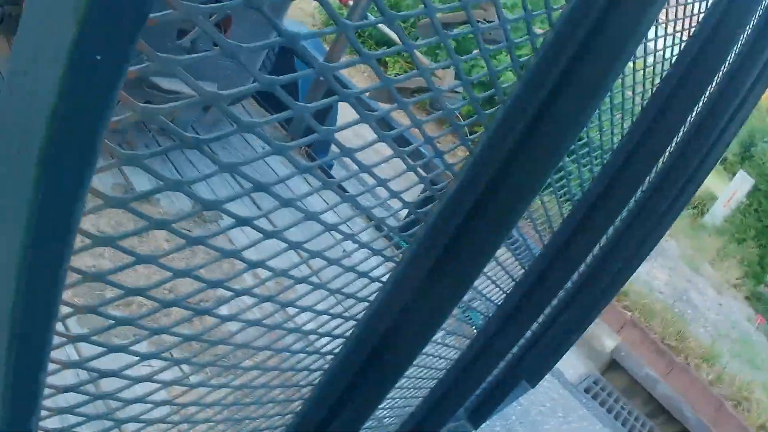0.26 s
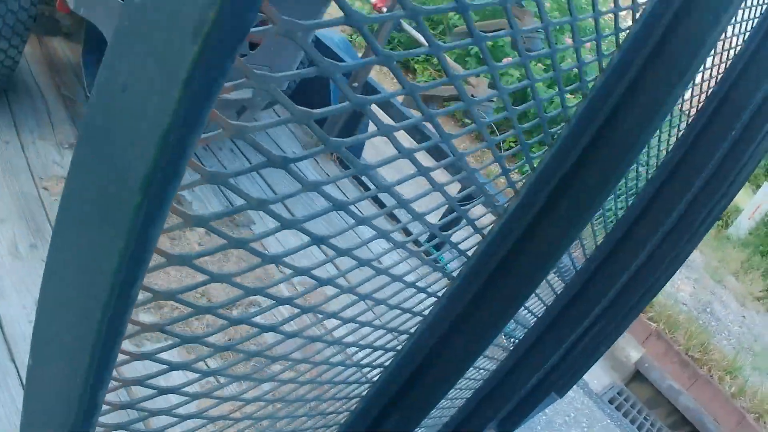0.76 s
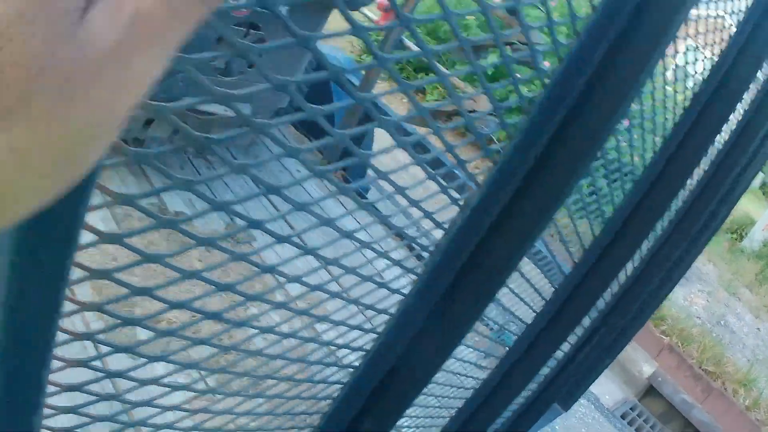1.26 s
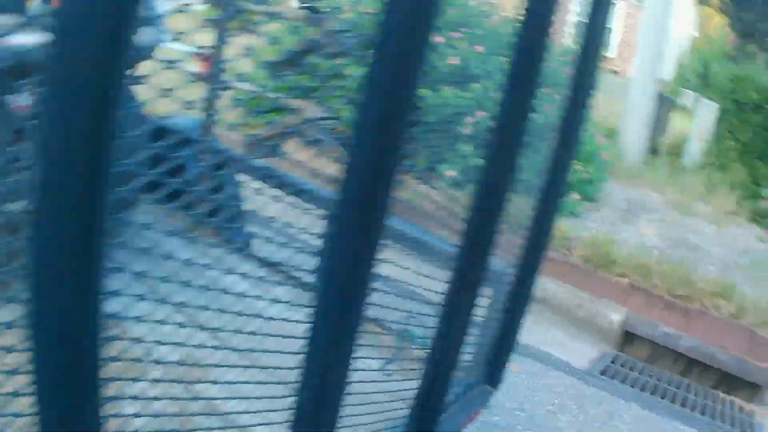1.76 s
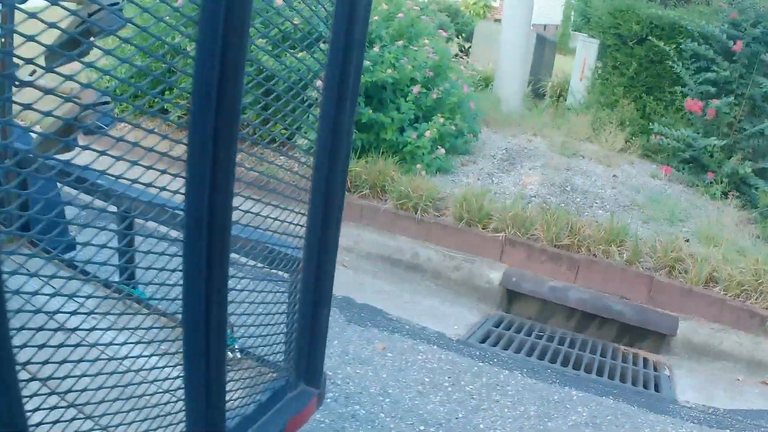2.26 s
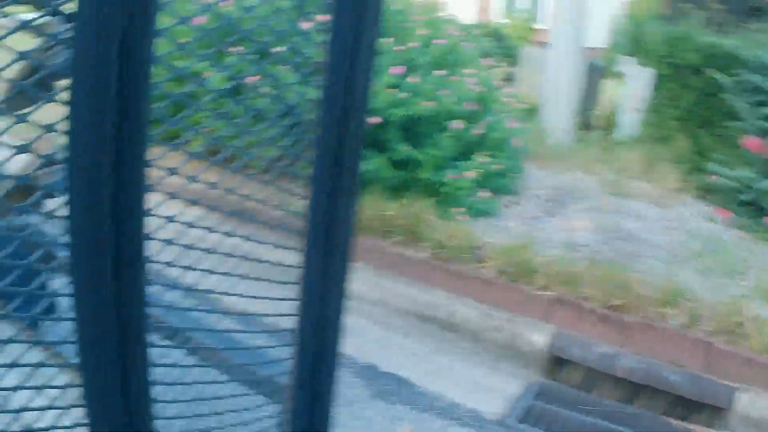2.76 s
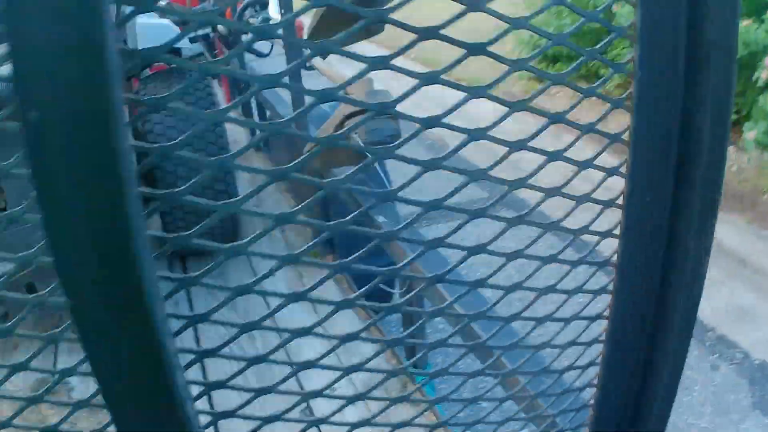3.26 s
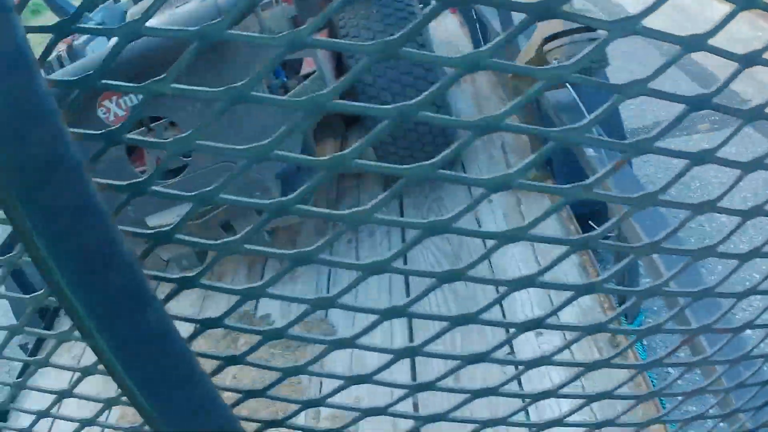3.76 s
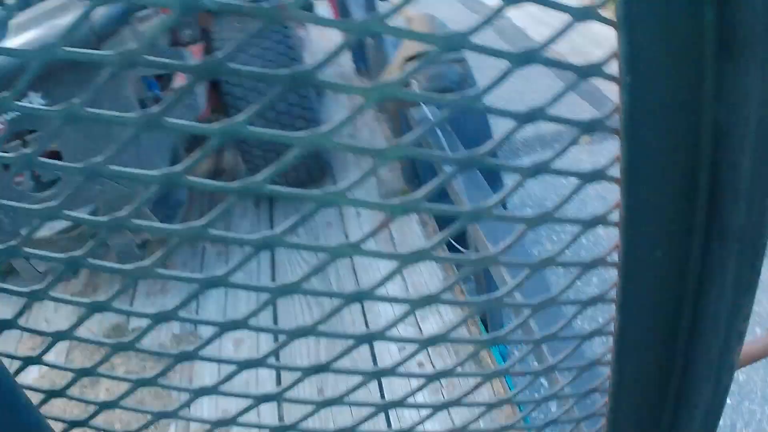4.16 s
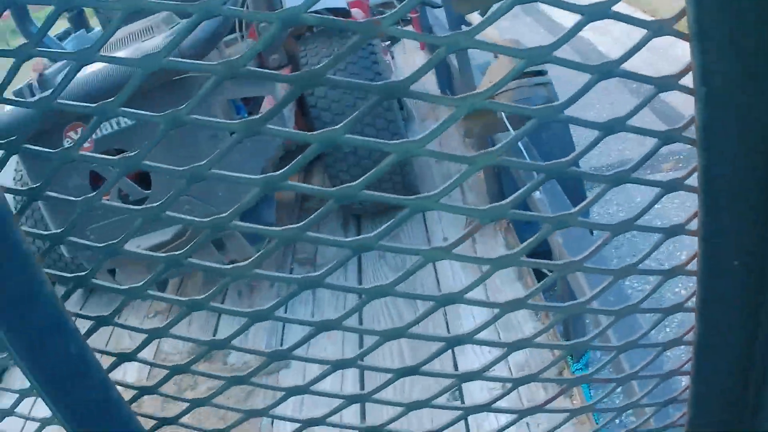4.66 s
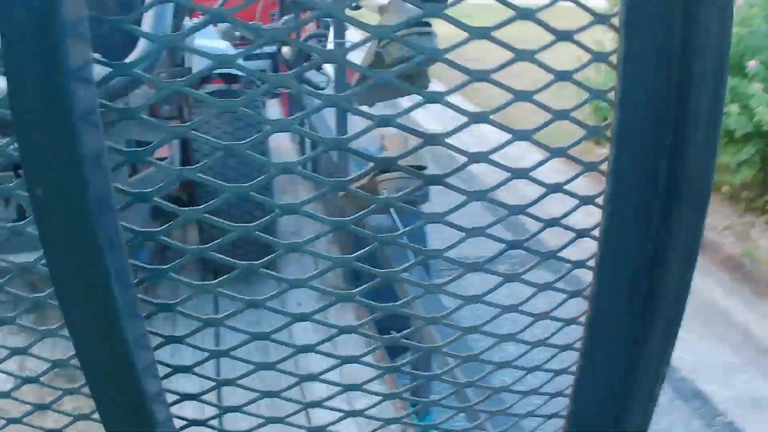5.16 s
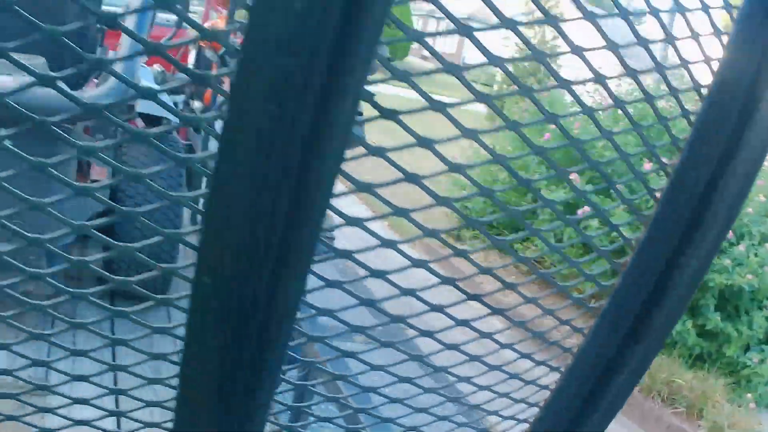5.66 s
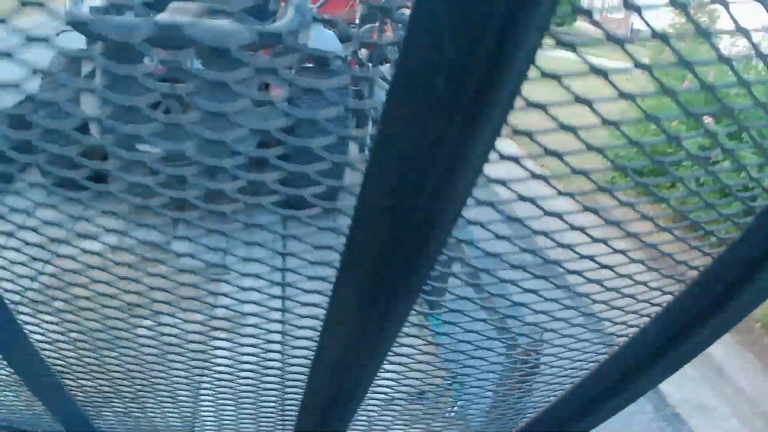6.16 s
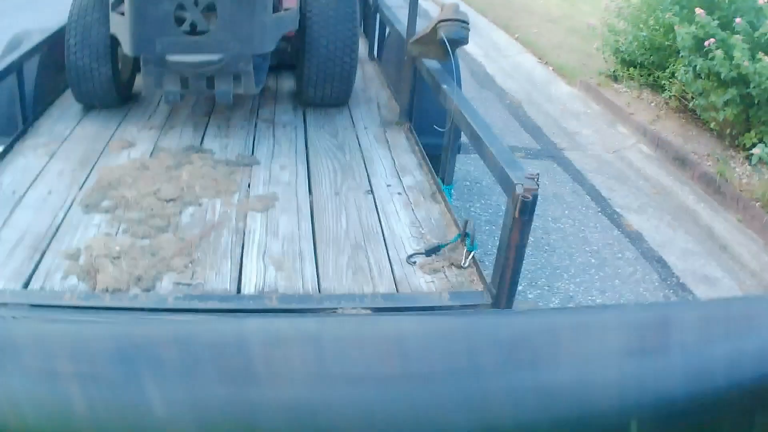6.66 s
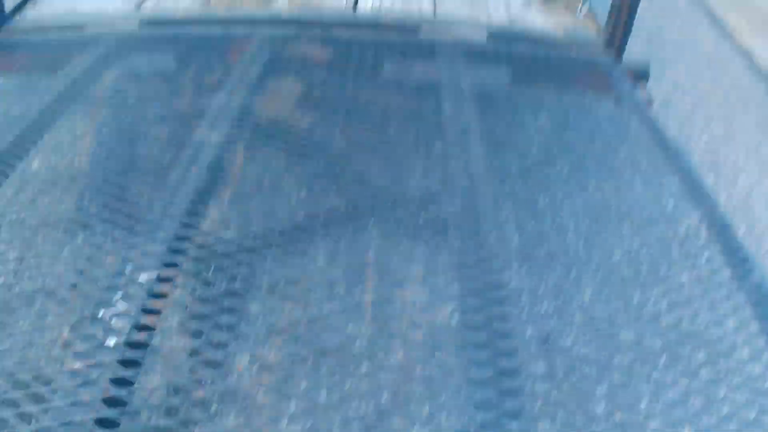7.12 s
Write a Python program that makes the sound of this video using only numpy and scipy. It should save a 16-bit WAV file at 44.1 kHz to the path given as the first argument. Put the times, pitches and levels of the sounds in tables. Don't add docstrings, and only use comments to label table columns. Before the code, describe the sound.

A steel-mesh trailer gate is handled right beside the microphone on a quiet street, with faint traffic hiss, a distant low drone and a light breeze behind. Soft mesh rattling and a short hinge note open it, with a dry latch click near 0.2 s, then near quiet. At 0.9-1.1 s a scrape and rapid hard clanks ring out, with smaller knocks at 1.3 and 1.6 s. Wind thumps the microphone around 1.8 s. Light taps and dull hand knocks follow until 3 s, then moderate clanks, a brief squeak and a dragged rattle at 3.9 s. Thin high squeaks and a pin jingle near 4.8 s precede the loudest crash at about 5 s. Strong, bright, chattering blows continue to 5.7 s. From 6 s the knocks are duller and sparser, fading until a low hinge note near 7.2 s and a last clank at 7.3 s.

```python
import sys
import numpy as np
from scipy import signal
from scipy.fft import rfft, irfft, next_fast_len
from scipy.io import wavfile
from scipy.ndimage import uniform_filter1d

SR = 44100
rng = np.random.default_rng(int(sys.argv[2]) if len(sys.argv) > 2 else 0)


def file_out(sig):
    cols = np.atleast_2d(sig).T
    lim = np.clip(cols, -1, 1)
    pcm = np.round(lim * 32767).astype(np.int16)
    wavfile.write(sys.argv[1], SR, pcm)


def how_loud(loudness_db):
    steps = np.asarray(loudness_db, float) / 20
    return 10 ** steps


N = 325899
STEP = 32
COARSE_S = np.arange(N // STEP + 2) * STEP / SR
DRAG_RISE_S = 0.0049

# (frequency [Hz], density [dB per Hz])
MESH_COLOUR = [(59, -50.5), (170, -4), (280, -4), (390, -3.5), (560, 0), (808, -5), (1130, -4.5),
               (1690, -7), (2130, -7), (2520, -9), (6000, -24), (10500, -26.5), (14500, -48.5)]
# (time [s], frequency [Hz], level [dB], t60 [s])
LATCHED_RINGS = [(0.181, 1210, -53, 0.18), (0.182, 3020, -39.5, 0.072), (0.182, 3770, -37, 0.053),
                 (0.877, 450, -29.5, 0.26), (0.877, 852, -36.5, 0.35), (0.877, 1030, -35, 0.37),
                 (0.983, 926, -32, 0.44), (0.983, 1067, -17, 0.08), (0.983, 1170, -44, 0.29),
                 (0.985, 1353, -30, 0.26), (0.982, 1448, -28, 0.29), (1.015, 940, -28, 0.23),
                 (1.015, 1076, -27, 0.27), (1.016, 1380, -22, 0.084), (0.982, 4180, -26, 0.068),
                 (1.062, 980, -31, 0.13), (1.062, 1310, -29, 0.075), (1.061, 4300, -26, 0.071),
                 (1.064, 3360, -26, 0.049), (1.326, 1180, -40, 0.053), (1.324, 1560, -43, 0.21),
                 (1.325, 2110, -39.5, 0.42), (1.326, 2740, -35, 0.075), (1.589, 1166, -40, 0.079),
                 (1.588, 1630, -47, 0.37), (1.588, 2670, -42, 0.13), (1.589, 2850, -30.5, 0.043),
                 (2.079, 742, -34, 0.07), (2.079, 1034, -40, 0.069), (2.079, 1420, -47, 0.14),
                 (2.116, 1310, -53, 0.22), (2.117, 1810, -46, 0.14), (2.913, 745, -45, 0.32),
                 (2.912, 1000, -40, 0.11), (3.274, 1010, -38, 0.093), (3.273, 1230, -40, 0.22),
                 (3.274, 1510, -39, 0.13), (3.273, 1680, -44, 0.29), (3.489, 1220, -51, 0.17),
                 (3.491, 1360, -55, 0.15), (3.684, 995, -37.5, 0.088), (3.683, 1300, -55, 0.2),
                 (3.871, 540, -34, 0.13), (3.873, 1056, -33, 0.089), (3.915, 603, -33, 0.23),
                 (3.871, 2320, -40, 0.36), (4.043, 600, -50, 0.25), (4.043, 2070, -46.5, 0.33),
                 (4.456, 1036, -42, 0.13), (4.456, 4200, -43, 0.074)]
# (time [s], frequency [Hz], level [dB], t60 [s])
FREE_RINGS = [(4.894, 472, -50, 0.37), (4.894, 1200, -47, 0.16), (4.957, 327, -21, 0.098),
              (4.957, 590, -16.5, 0.15), (4.957, 978, -8, 0.053), (4.957, 1195, -12.5, 0.074),
              (4.957, 2100, -19, 0.22), (4.957, 4170, -21, 0.099), (5.046, 583, -23, 0.15),
              (5.046, 1121, -23, 0.12), (5.046, 2200, -40, 0.16), (5.046, 2390, -30, 0.18),
              (5.046, 4340, -31, 0.13), (5.213, 1600, -30, 0.11), (5.213, 1880, -39, 0.14),
              (5.213, 2440, -44, 0.1), (5.213, 2930, -35, 0.17), (4.957, 510, -19, 0.14),
              (5.299, 1890, -23.5, 0.075), (5.299, 2940, -35.5, 0.17), (5.471, 606, -19.5, 0.17),
              (5.471, 1000, -24, 0.085), (5.471, 1154, -20, 0.15), (5.471, 1428, -18, 0.062),
              (5.471, 2300, -19.5, 0.046), (5.471, 2960, -20.5, 0.059), (5.651, 1015, -26, 0.071),
              (5.651, 1300, -23, 0.054), (5.651, 2130, -22, 0.043), (5.651, 2855, -24, 0.039),
              (5.782, 1042, -48, 0.41), (5.782, 1297, -43, 0.24), (6.033, 457, -35, 0.22),
              (6.033, 618, -33, 0.25), (6.033, 1018, -33, 0.1), (6.033, 1260, -39, 0.18),
              (6.07, 1070, -34.5, 0.083), (6.07, 1260, -40, 0.083), (6.147, 462, -41, 0.35),
              (6.147, 1020, -40, 0.059), (6.147, 1275, -39, 0.063), (6.268, 1050, -40.5, 0.086),
              (6.464, 1030, -36, 0.091), (6.464, 1390, -45.5, 0.12), (6.464, 2100, -34.5, 0.15),
              (6.678, 450, -43.5, 0.29), (6.923, 441, -52.5, 0.39), (7.327, 486, -43, 0.29),
              (7.327, 637, -39, 0.15), (7.327, 1286, -46, 0.083)]


def rms_one(x):
    return x / np.sqrt(np.mean(x ** 2) + 1e-20)


def fine(coarse):
    return np.interp(np.arange(N) / STEP, np.arange(len(coarse)), coarse)


def at_hz(points, hz):
    point_hz, value = np.transpose(points)
    return np.interp(np.log(hz), np.log(point_hz), value)


def drift(rate_hz):
    r = np.exp(-2 * np.pi * STEP * rate_hz / SR)
    chance = rng.standard_normal(N // STEP + 2002)
    return rms_one(signal.lfilter([1], [1, -2 * r, r * r], chance)[2000:])


def ring(drive, hz, t60):
    r = how_loud(-60 / (max(t60, 1 / 300) * SR))
    w = 2 * np.pi * hz / SR
    return signal.lfilter([0, np.sin(w)], [1, -2 * r * np.cos(w), r * r], drive + 1e-18)


def bands(low_hz, count, grit_db=0):
    edges = low_hz * 2 ** (np.arange(count + 1) / 3)
    white = rng.standard_normal((2, N))
    white = rms_one(white * how_loud(grit_db * np.minimum(rng.exponential(1, N), 5)))
    for k in range(count):
        sos = signal.butter(2, edges[k:k + 2], "band", fs=SR, output="sos")
        yield np.sqrt(edges[k] * edges[k + 1]), signal.sosfilt(sos, white[k % 2])


def coloured(spectrum, low_hz, count, patchy_db, rate_hz):
    out = np.zeros(N)
    for hz, noise in bands(low_hz, count):
        out += noise * fine(how_loud(at_hz(spectrum, hz) + patchy_db * drift(rate_hz)))
    return rms_one(out)


def dying(s, db, t60, rise_s, count=900):
    age = np.arange(count) * STEP / SR
    fall = np.exp(-2 * np.log(1000) * age / np.maximum(t60, .01)[:, None])
    power = (1 - np.exp(-age / rise_s)) ** 2 * how_loud(2 * db)[:, None] * fall
    at = (s * SR / STEP).astype(int)[:, None] + np.arange(count)
    return np.bincount(at.ravel(), power.ravel(), N // STEP + 2)[:N // STEP + 2]


def window(s, length, edge_s):
    opening = (COARSE_S - s) / edge_s
    closing = (s + length - COARSE_S) / (3 * edge_s) + 1
    return np.clip(np.minimum(opening, closing), 0, 1)


def street():
    # (frequency [Hz], density [dB per Hz])
    far_colour = [(60, -31), (100, -7), (175, 1.5), (200, -11.5), (500, -20.5), (1200, -29.5),
                  (3000, -33.5), (6000, -37.5), (15800, -41.5)]
    size = next_fast_len(N)
    colour = how_loud(at_hz(far_colour, np.arange(size // 2 + 1) * SR / size + 1))
    hiss = rms_one(irfft(rfft(rng.standard_normal(size)) * colour, size)[:N])
    drone = rms_one(ring(rng.standard_normal(N), hz=110, t60=0.55))
    return how_loud(-60) * hiss * fine(how_loud(0.72 * drift(3))) + how_loud(-60) * drone


def wind_db():
    # (time [s], peak [dB], loss either side [dB per s])
    gusts = [
        (0.39, -49, 37),
        (0.9, -51, 15),
        (1.77, -31.5, 124),
        (1.97, -41, 45),
        (5.95, -43.5, 49),
        (7.119, -46, 35),
        (7.33, -46.5, 132),
    ]
    breeze_db = -52 + 0.5 * drift(2.0)
    return np.max([breeze_db] + [db - loss_db * abs(COARSE_S - s) for s, db, loss_db in gusts], axis=0)


def wind():
    # (frequency [Hz], density [dB per Hz])
    gust_colour = [(20, -4.5), (35, 1), (60, 2), (110, -5), (200, -13), (400, -36)]
    # (time [s], level [dB], frequency [Hz], t60 [s])
    bumps = [(.56, -43.5, 254, 0.2), (.88, -29, 170, .15), (1.02, -22.5, 260, .2), (1.0, -27, 200, .15),
             (1.3, -35, 160, .15), (1.6, -34, 165, .12), (1.758, -15, 57, 0.047), (1.985, -33, 166, 0.12),
             (1.992, -30, 250, .08), (1.99, -36, 370, .08), (2.008, -33, 212, .1), (3.04, -40, 145, .15),
             (3.49, -37, 185, .15), (4.96, -23, 185, .12), (5.13, -29.5, 175, 0.15), (5.77, -32, 195, 0.1),
             (5.95, -36, 45, .045), (6.945, -42, 200, .12)]
    out = fine(how_loud(wind_db())) * coloured(gust_colour, 20.15, count=13, patchy_db=5.5, rate_hz=3.2)
    for s, db, hz, t60 in bumps:
        knock = np.zeros(N)
        knock[int(s * SR):int(s * SR) + 60] = how_loud(db) / 60
        out += ring(knock, hz, t60)
    return out


def singing():
    # (time [s], length [s], frequency [Hz], level [dB])
    squeaks = [(0.005, 0.031, 1000, -39), (0.055, 0.044, 1004, -39.5), (0.1, 0.036, 1014, -44),
               (0.546, 0.077, 995, -56.5), (1.03, 0.2, 12130, -70), (1.33, .2, 12150, -70),
               (4.161, 0.014, 6700, -48), (0.43, .035, 4170, -72), (4.143, .015, 5500, -56),
               (4.344, 0.028, 6740, -48), (6.47, .12, 2050, -52.5), (0.881, 0.067, 1000, -32.5),
               (0.882, 0.035, 450, -54), (1.266, 0.069, 450, -33.5), (2.628, .03, 7700, -72),
               (3.305, 0.13, 504, -45), (4.741, 0.034, 6200, -58), (4.745, .03, 5450, -69),
               (4.789, 0.079, 9680, -43), (4.812, 0.054, 5400, -47), (4.837, .02, 7960, -42),
               (4.835, .015, 12000, -56), (5.333, 0.084, 9700, -61), (5.34, .02, 12100, -63),
               (2.0, 0.11, 5850, -64), (3.303, 0.12, 1510, -46), (3.32, 0.071, 1000, -48),
               (3.32, 0.088, 1183, -50), (4.957, 0.033, 5470, -32), (4.996, 0.027, 9600, -38),
               (5.12, .035, 9500, -47), (4.998, .06, 8100, -44), (5.07, 0.03, 11800, -50),
               (1.07, 0.18, 517, -60), (4.41, 0.027, 6600, -45), (1.32, 0.028, 6370, -35.5),
               (3.678, 0.03, 12000, -45), (5.227, 0.07, 9750, -52), (6.712, .055, 5700, -68.5),
               (7.168, 0.037, 4180, -72), (7.344, .05, 4140, -72)]
    # (time [s], length [s], frequency [Hz], level [dB])
    lowering = [
        (7.176, 0.059, 564, -38.5),
        (7.25, 0.082, 565, -50),
        (7.185, 0.11, 2080, -51.5),
    ]
    notes = [(*row, 0.0095) for row in squeaks] + [(*row, 0.035) for row in lowering]
    out = np.zeros(N)
    wavering_t = np.arange(N) / SR + 0.0025 * np.cumsum(fine(drift(40))) / SR
    for s, length, hz, db, rise_s in notes:
        swell = np.clip((COARSE_S - s) / rise_s, 0, 1)
        fade_db = np.clip(-7.0 * (COARSE_S - s) / length, -30, 0)
        level = how_loud(db + fade_db + 4.2 * drift(45)) * window(s, length, 0.0073) * swell
        level = fine(level)
        on = level > 0
        out[on] += level[on] * np.sin(2 * np.pi * hz * wavering_t[on])
    return out


def pin():
    # (frequency [Hz], level [dB], t60 [s])
    pin_modes = [(2760, 3, 0.34), (3760, -4, 0.19), (4600, 1, 0.23), (5700, 5, 5.0), (6358, -5, 0.13),
                 (7500, -4, 1.7), (8200, 6, 0.22), (9330, -3, 0.35), (10250, -3, 0.19), (10850, -9, 0.22),
                 (11800, -7, 0.076), (13740, -15, 0.22)]
    # (time [s], length [s], level [dB])
    jingles = [
        (1.978, 0.05, -63.5),
        (4.781, 0.095, -57.5),
    ]
    shake = fine(sum(how_loud(db) * window(s, length, 0.0065) for s, length, db in jingles))
    touches = (rng.random(N) < 900 / SR) * shake
    out = np.zeros(N)
    for hz, db, t60 in pin_modes:
        out += ring(touches * how_loud(db) * rng.standard_normal(N), hz, min(t60, 0.022))
    return out


def snaps():
    # (time [s], level [dB])
    clicks = [
        (6.301, -31),
        (.1832, -31),
        (4.0445, -31),
    ]
    # (frequency [Hz], level [dB], t60 [s])
    snap_modes = [(2200, -3, .006), (4200, -4, .005), (6300, 0, .004), (9300, 1, .005), (11200, -5, .004)]
    s, level_db = np.transpose(clicks)
    drive = np.zeros(N)
    drive[(s * SR).astype(int)] = how_loud(level_db)
    drive = uniform_filter1d(drive, size=3)
    return sum(ring(drive * how_loud(db), hz, t60) for hz, db, t60 in snap_modes)


def blows():
    # (time [s], peak [dB], mesh brightness [dB re peak], clank [Hz])
    latched = [(0.051, -30.5, -22, 930), (0.101, -41, -34, 970), (0.184, -30, -9, 1220),
               (0.198, -35, -4, 1080), (0.477, -45, -10, 465), (0.886, -29, -12.5, 453),
               (0.984, -13, -10.5, 1050), (1.016, -15, -9.5, 919), (1.063, -18, -4.5, 1324),
               (1.249, -38, -15, 870), (1.266, -34, -20, 446), (1.326, -19.5, -6.5, 1275),
               (1.589, -23, -14.5, 1515), (1.713, -31, -26.5, 1284), (2.079, -28.5, -35.5, 1000),
               (2.116, -41, -15, 1885), (2.149, -40, -27, 1950), (2.193, -39.5, -21.5, 1920),
               (2.353, -42.5, -20, 1810), (2.895, -38.5, -21, 1520), (2.914, -29, -24, 1052),
               (2.989, -31, -18.5, 1002), (3.043, -32.5, -15.5, 1024), (3.274, -24, -21.5, 1470),
               (3.426, -38, -11.5, 589), (3.462, -33, -25, 1540), (3.492, -26, -8, 954),
               (3.624, -37.5, -8.5, 422), (3.683, -31.5, -4, 1004), (3.833, -37, -19, 945),
               (4.045, -29.5, -12, 1520), (4.401, -41.5, 4.5, 1890), (4.457, -32, -4.5, 2275)]
    # (time [s], peak [dB], mesh brightness [dB re peak], clank [Hz])
    free = [(4.794, -34.5, -8, 1176), (4.81, -34, -0.5, 1888), (4.958, -5, -8.5, 1060),
            (5.046, -12.5, -10, 581), (5.214, -12, -20, 2320), (5.472, -9.5, -11, 1112),
            (5.654, -15.5, -16, 1372), (5.782, -24, -22, 1299), (5.874, -38.5, -7.5, 572),
            (6.035, -22.5, -24.5, 642), (6.07, -25.5, -27, 446), (6.148, -24, -26, 902),
            (6.226, -33.5, -30.5, 475), (6.268, -29.5, -32, 617), (6.32, -33.5, -27.5, 453),
            (6.453, -28, -20, 612), (6.465, -22.5, -20, 1195), (6.679, -33.5, -34, 658),
            (7.156, -40.5, -24.5, 1930), (7.255, -47.5, -25, 2620), (7.327, -29, -23, 605),
            (7.338, -34.5, -35, 471)]
    # (time [s], peak [dB], mesh brightness [dB re peak], clank [Hz])
    drags = [(0.129, -40, -19, 980), (0.822, -39.5, -9.5, 823), (0.875, -23.5, -3, 890),
             (1.581, -26, -10, 420), (3.871, -19, -7.5, 1875), (3.91, -27, -8, 624),
             (4.859, -28.5, 4, 1367), (4.895, -16, -6, 436), (5.298, -20, -12.5, 2300),
             (5.399, -38.5, -1.5, 1900), (5.072, -16.5, -5.5, 604), (6.92, -43, -55.5, 681),
             (6.965, -48, -47, 514)]
    # (time [s], peak [dB])
    faint = [(0.529, -53.5), (0.569, -57), (0.658, -50), (0.792, -52.5), (1.557, -42.5), (1.76, -37),
             (1.783, -41), (3.779, -44.5), (4.266, -48), (4.353, -42), (4.754, -57), (4.783, -45),
             (5.94, -43), (6.427, -53.5), (6.608, -45.5), (6.633, -54)]
    touches = [(s, db, -29, 450) for s, db in faint]
    # (rows, thud [dB re peak], chatter t60 [s], 1 if dragged)
    kinds = ((latched, -11.5, 0.27, 0), (free, -13.5, 0.22, 0), (drags, -11, 0.33, 1), (touches, -14, 0.29, 0))
    rows = [(*row, *kind[1:]) for kind in kinds for row in kind[0]]
    s, peak_db, bright_db, clank_hz, thud_db, t60, dragged = np.transpose(rows)
    thud_db = thud_db + 0.04 * np.maximum(-30 - peak_db, 0)
    thud_db = thud_db - 4 * np.log2(clank_hz / 800)
    thud_db += -9.5 * ((s > 2.8) & (s < 3.4))
    return np.array([s, peak_db, thud_db, bright_db, t60, clank_hz, dragged])


def blow_colour(hz):
    s, peak_db, thud_db, bright_db, t60, clank_hz = blows()[:6]
    low = at_hz([(280, 0.84), (700, 0)], hz)
    high = at_hz([(1100, 0.011), (2000, 0.19), (5000, 0.88), (13000, 1.0)], hz)
    ring_s = np.array([row[0] for row in [*LATCHED_RINGS, *FREE_RINGS]])
    rung = np.min(abs(s[:, None] - ring_s), axis=1) < 1 / 150
    peak_db = peak_db - 3 * rung * at_hz([(250, 0), (500, 1), (2200, 0.81), (3500, 0.0)], hz)
    spot_db = 4.7 * np.exp(-(np.log2(hz / clank_hz) / 0.34) ** 2)
    return peak_db + at_hz(MESH_COLOUR, hz) + low * (thud_db + 18.0) + high * (bright_db + 16.0) + spot_db


def frame():
    # (frequency [Hz], level [dB], t60 [s])
    upright = [(486.5, -14, 5.0), (1000, 0, 0.2), (1195, -15, 0.32), (1470, -6, 0.28), (1702, -12, 0.43),
               (2070, -14, 0.3)]
    # (frequency [Hz], level [dB], t60 [s])
    freed = [(480, -8, 0.27), (590, -10.5, 0.44), (815, -16.5, 0.19), (1140, -5, 0.12), (1770, -28.5, 0.55),
             (2050, -11, 0.37), (2200, -31, 0.51), (2350, -25.5, 0.25)]
    freed_at_s = 4.7
    s, peak_db = blows()[:2]
    out = np.zeros(N)
    for modes, struck, gain_db in ((upright, s < freed_at_s, -37), (freed, s >= freed_at_s, -39.5)):
        luck = rng.standard_normal((len(s), len(modes)))
        for k, (hz, level_db, t60) in enumerate(modes):
            db = peak_db + 0.66 * level_db + gain_db + 3.0 * luck[:, k]
            contact_t60 = np.full(struck.sum(), 0.055)
            contact = np.sqrt(dying(s[struck], db[struck], contact_t60, 0.00086, count=120))
            out += ring(fine(contact) * rng.standard_normal(N), hz, min(t60, .24))
    return out


def clanks():
    s, hz, db, t60 = np.transpose([*LATCHED_RINGS, *FREE_RINGS])
    age, out = np.arange(9000) / SR, np.zeros(N + 9000)
    phase = rng.random((len(s), 1))
    level = how_loud(db[:, None] - 60 * age / np.maximum(t60, .02)[:, None])
    rings = level * np.sin(2 * np.pi * (hz[:, None] * age + phase))
    rings *= np.minimum(age / 0.0011, 1)
    for at, sound in zip((s * SR).astype(int), rings):
        out[at:at + 9000] += sound
    return out[:N] * fine(how_loud(2.5 * drift(60)))


def strands():
    s, t60, clank_hz, dragged = blows()[[0, 4, 5, 6]]
    luck = rng.random((len(s), 12, 3))
    age, out = np.arange(2600) / SR, np.zeros(N + 2600)
    hz = 350 * 32 ** ((np.arange(12) + luck[..., 0]) / 12)
    hz[:, 0] = clank_hz
    db = np.transpose([blow_colour(column) for column in hz.T])
    db = db - 17 + 0.6 * np.log2(hz / 1000) + 8 * luck[..., 1]
    fall = 60 / np.minimum(t60[:, None] * (0.15 + .35 * luck[..., 2]), .11)
    for k, at in enumerate(((s - .002) * SR).astype(int)):
        rings = how_loud(db[k, :, None] - fall[k, :, None] * age) * np.sin(2 * np.pi * hz[k, :, None] * age)
        rise = np.minimum(age / (0.0038 + DRAG_RISE_S * dragged[k]), 1)
        out[at:at + 2600] += rings.sum(axis=0) * rise
    return out[:N] * fine(how_loud(4.17 * drift(64)))


def mesh():
    # (time [s], peak [dB], centre [Hz])
    ticks = [(0.075, -45, 6500), (0.378, -50, 3100), (0.4894, -62, 3450), (1.704, -38, 5750),
             (1.779, -40, 9700), (1.8841, -55, 4300), (2.1161, -40.5, 3900), (2.1494, -47, 3310),
             (2.2394, -56, 3150), (3.676, -31.5, 5510), (4.0218, -35.5, 5270), (4.163, -36.5, 6240),
             (4.2672, -40, 4150), (4.341, -38, 6340), (4.4, -30, 6360), (4.905, -19, 8500),
             (5.083, -13.5, 6950), (5.403, -33, 8500), (5.64, -36, 8000), (5.748, -33, 3240),
             (5.8691, -42, 4750), (5.942, -35.5, 3270), (5.9694, -57, 3430), (5.01, -26.5, 6000),
             (1.976, -45, 6500), (1.06, -15, 4600), (1.99, -43, 5900), (3.872, -27, 4500),
             (6.61, -46, 3470), (5.215, -35, 7000), (6.466, -36.5, 3840), (5.302, -25.5, 9500),
             (0.862, -49, 8500)]
    # (time [s], level [dB])
    shaking = [(0.0, -37.5), (0.1, -44), (0.25, -46.5), (0.56, -59.5), (0.86, -67.5), (1.05, -36),
               (1.23, -47.5), (1.93, -55), (2.74, -71), (3.36, -54), (3.91, -42.5), (4.72, -59),
               (5.08, -27), (5.27, -52.5), (5.68, -40), (5.84, -52.5), (6.8, -62.5), (7.39, -60)]
    # (frequency [Hz], t60 [re the blow's chatter t60])
    decay = [(120, 2.6), (400, 1.99), (1200, 1.36), (4000, 0.81), (12000, 0.61)]
    s, t60, dragged = blows()[[0, 4, 6]]
    rise_s = np.where(dragged, DRAG_RISE_S, 0.0015)[:, None]
    tick_s, tick_db, tick_hz = np.transpose(ticks)
    body_db = np.interp(COARSE_S, *np.transpose(shaking))
    strands_db = -65.5 + 1.35 * (body_db + 49.5)
    luck, out = rng.standard_normal((len(s), 22)), np.zeros(N)
    clatter = how_loud(1.34 * drift(110))
    for k, (hz, noise) in enumerate(bands(99.4, count=22, grit_db=2.5)):
        blow_db = blow_colour(hz) + 3.56 + 3.1 * luck[:, k]
        power = dying(s - .0018, blow_db, 0.84 * t60 * at_hz(decay, hz), rise_s + .5 / hz)
        crack_db = blow_db + .4 - 8.5 * dragged
        power += dying(s - .0018, crack_db, np.full_like(s, 0.038), 0.00047 + .3 / hz, count=80)
        after_t60 = 0.52 * at_hz([(600, 0.71), (2500, 0.85)], hz)
        power += dying(s, blow_db - 11.5, np.full_like(s, after_t60), 0.0053)
        tick_colour_db = at_hz([(10500, 2.5), (15000, -17.5)], hz) - 8 * np.log2(hz / tick_hz) ** 2
        tick_t60 = np.full_like(tick_s, 0.12)
        power += dying(tick_s - .002, tick_db - 6.0 + tick_colour_db, tick_t60, 0.0033, count=400)
        high = at_hz([(1000, 0.049), (2600, 0.94)], hz)
        shiver_db = (1 - high) * (body_db + 13) + high * (strands_db + 23.0)
        shiver = how_loud(at_hz(MESH_COLOUR, hz) + shiver_db + 3.5 * drift(12.0))
        out += noise * fine(clatter * np.sqrt(power + shiver ** 2))
    return out


def panel(chatter):
    t60_s, share = 0.047, 0.22
    luck, age = rng.random((220, 2)), np.arange(6000) / SR
    hz = 120 * 115 ** ((np.arange(220) + luck[:, 0]) / 220)
    strength = np.sqrt(hz) * how_loud(7 * luck[:, 1])
    modes = np.sin(2 * np.pi * (hz[:, None] * age + luck[:, 1:] * 7))
    response = strength @ modes * how_loud(-60 * age / t60_s)
    rung = rms_one(signal.fftconvolve(chatter, response)[:N]) * np.std(chatter)
    return np.sqrt(1 - share) * chatter + np.sqrt(share) * rung


def scene():
    around = street() + wind()
    fittings = singing() + pin() + snaps()
    gate = frame() + clanks() + strands() + panel(mesh())
    return (around + fittings + gate)[None]


def low_pass(x):
    return signal.sosfilt(signal.butter(12, 16320, fs=SR, output="sos"), x)


def record(dry):
    top_cut = signal.cheby2(10, 60, 16500, fs=SR, output="sos")
    return low_pass(signal.sosfilt(top_cut, np.clip(dry, -1, 1)))


dry = scene()
out = record(dry)
file_out(out)
```